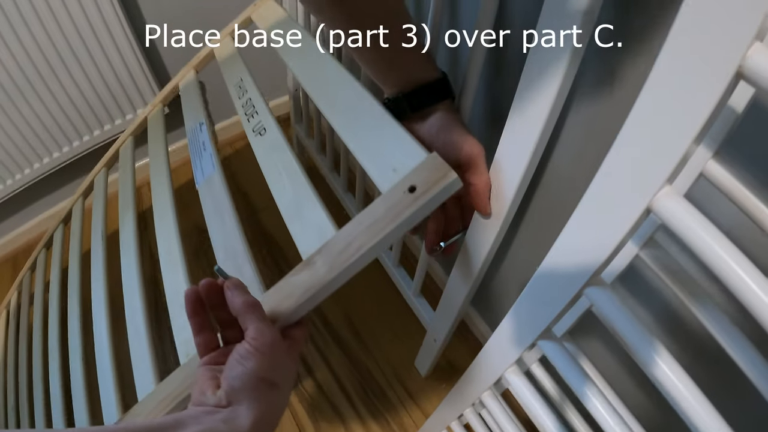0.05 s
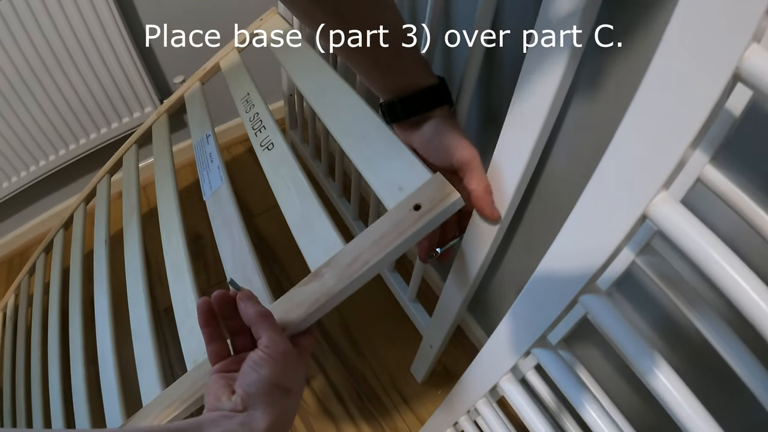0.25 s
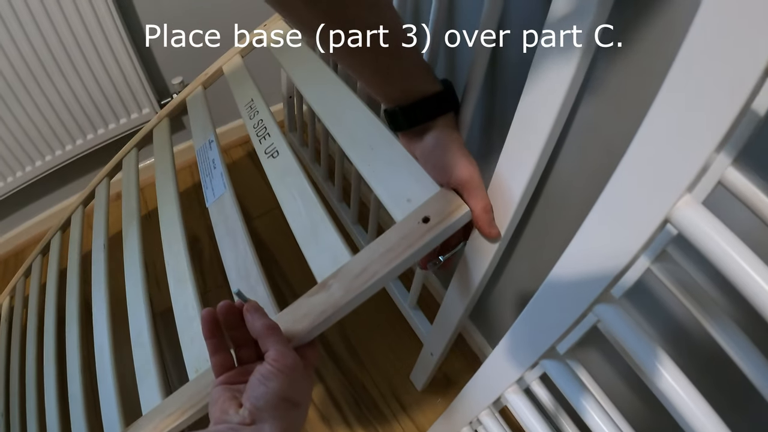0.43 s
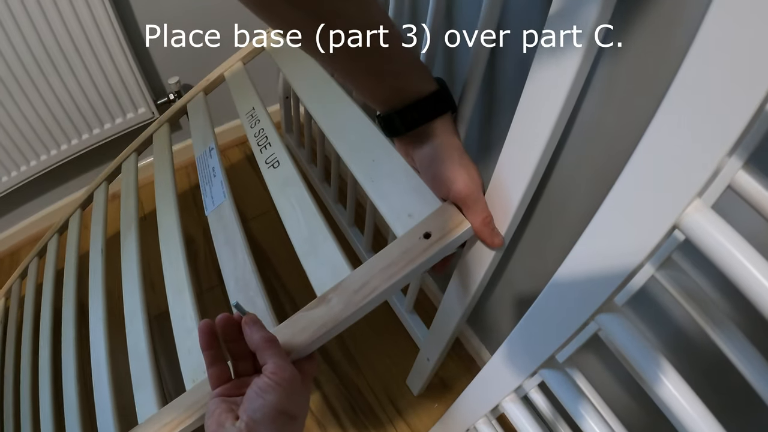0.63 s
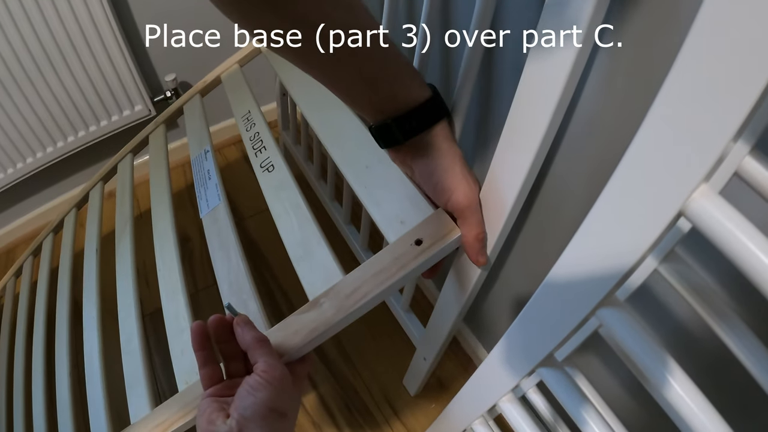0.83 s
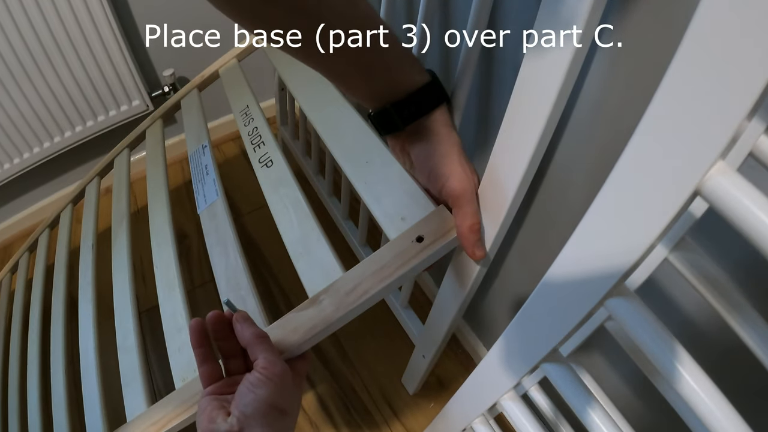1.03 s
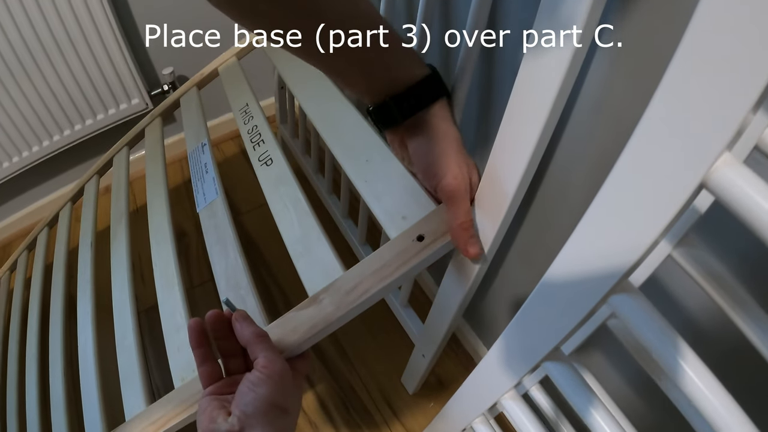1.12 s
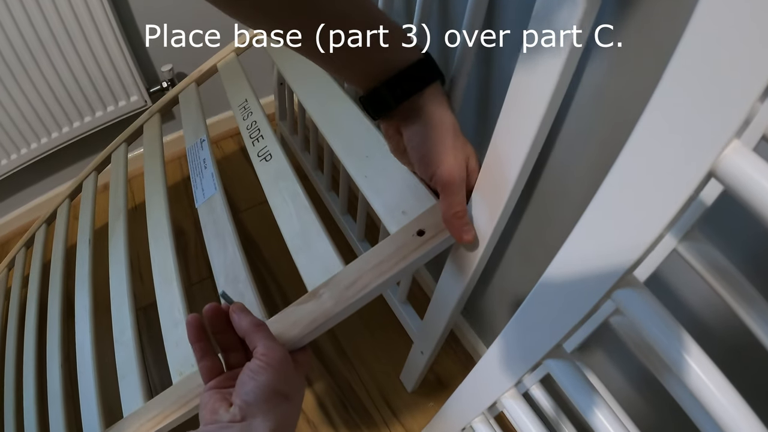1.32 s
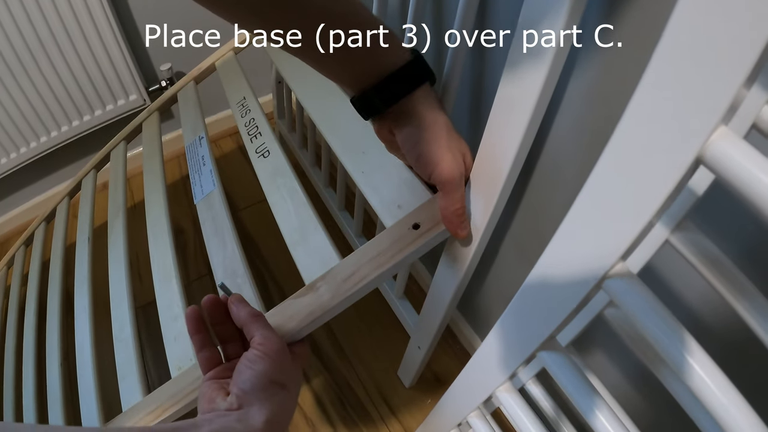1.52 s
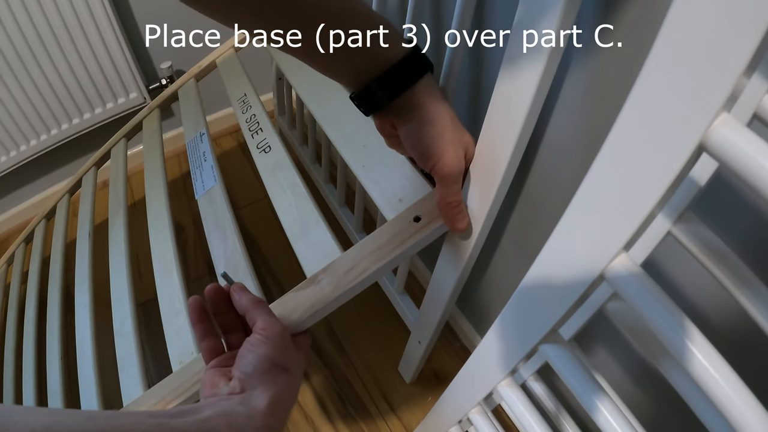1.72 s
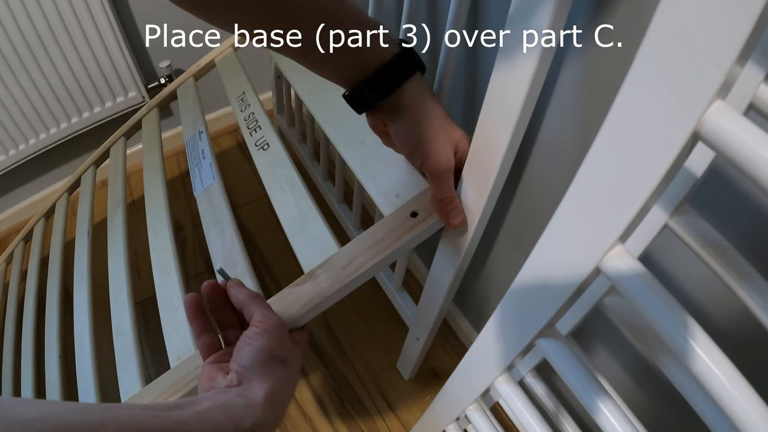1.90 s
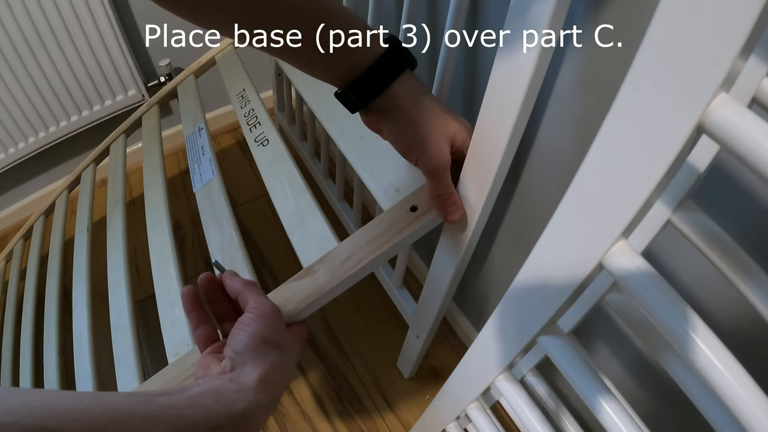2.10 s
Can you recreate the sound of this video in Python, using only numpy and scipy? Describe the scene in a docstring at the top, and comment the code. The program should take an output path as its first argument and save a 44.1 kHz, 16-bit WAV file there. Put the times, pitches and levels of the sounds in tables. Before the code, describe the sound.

A slatted wooden base thumps inside a cot frame, loudest around 0.3 seconds, mixed with light clacks. Softer bumps follow at 0.6 and 1.05 seconds, over faint hissing rubs and a low judder of the swaying frame. Sharp wood knocks and slat clacks come at about 1.35 and 1.75 seconds, then a brief low rumble near 2 seconds. It is about a metre away in a small quiet room.

```python
"""Fitting a bed base into a cot

A slatted wooden base is worked into its frame, about a metre away in a small quiet room. Dull
thumps ring the base and the cot, shoves set the frame swaying, wood meets wood in sharp knocks
and a loose slat clacks. Tiny stick-slips along the side make a hissing rub, a low judder and
brief scuffs. The brighter sounds get a short room echo, over a faint bed of air."""
import sys
import numpy as np
from scipy import signal
from scipy.fft import rfft, irfft, next_fast_len
from scipy.io import wavfile

SR = 44100
rng = np.random.default_rng(int(sys.argv[2]) if len(sys.argv) > 2 else 0)


def unload_wav(signal):
    """Save mono or channel-first audio to the path in sys.argv[1] as 16-bit WAV at rate SR, clipped to [-1, 1]."""
    wavfile.write(
        sys.argv[1],
        SR,
        np.round(np.clip(np.atleast_2d(signal).T, -1, 1) * 32767).astype(np.int16),
    )


N = 94815

# dull bumps of the base on the frame: start_s, level_db, contact_ms
THUMP_HITS = [(.236, -27.5, 7.35), (0.244, -39.5, 1.6), (.27, -27.5, 3.3), (.286, -26, 1.19),
              (0.3, -25.5, 4.17), (.348, -34.5, 5.73), (0.605, -34.5, 3.17), (0.619, -33, 5.5),
              (0.721, -45.5, 2.93), (0.845, -48.5, 4), (0.927, -47.5, 2.2), (1.043, -42, 2.24),
              (1.062, -40, 3.06), (1.937, -45.5, 5.6)]
# modes of the base: pitch_hz, level_db, t60_s
BASE_RESONANCES = [(104.4, -0.5, 0.33), (142.46, -2.5, 0.67), (166, -5, 0.51), (219.2, 1, 0.3),
                   (288.8, 2.5, 0.23), (312.9, 4, 0.16), (438.7, -5.5, 0.19), (472.3, -13, 0.35),
                   (540.5, -6, 0.2), (690, -10.5, 0.17)]
# dense resonances of the cot under a bump: freq_hz, level_db
BODY_EQ = [(40, -24), (90, 21.5), (150, 13), (320, 15.5), (390, -4.5), (700, -2.5), (1500, -18),
           (4000, -84.5)]
BASE_DB, BODY_DB, BODY_T60_S, THUMP_RISE_S = -6, -3.5, 0.33, 0.0091
# shoves that set the frame swaying: start_s, build_s, rock_db, flex_db
SWAY_SHOVES = [(0.283, 0.084, -43, -32), (0.48, 0.06, -42.5, -47.5), (.629, 0.13, -37, -30),
               (0.866, 0.16, -37, -39.5), (1.048, 0.094, -38.5, -37), (1.293, 0.057, -53.5, -67),
               (1.561, 0.082, -49, -63.5), (1.876, 0.17, -39.5, -38.5)]
ROCK_HZ, ROCK_T60_S, FLEX_HZ, FLEX_T60_S = 32.64, 0.64, 77.61, 0.82

# sharp knocks of wood on wood: start_s, level_db, tilt_db_per_octave, frame_modes_db
KNOCK_HITS = [(.206, -50, 2.5, -4), (.286, -41, -7.5, -22), (0.287, -53.5, 1.5, -15),
              (.603, -49.5, -0.5, -22), (.929, -54.5, -0.5, -14), (1.3327, -45, 0.5, -32),
              (1.342, -48.5, -2, -22), (1.7624, -36.5, 0.5, -15)]
# tone of bare wood contact in knocks, clacks and scuffs: freq_hz, level_db
CONTACT_EQ = [(40, -29), (400, -0.5), (750, 4), (1100, 5.5), (1700, 2), (2300, -7), (3300, -11.5),
              (4400, -17), (8000, -29), (12000, -52.5)]
SNAP_DB, CRACK_T60_S = 3.5, 0.027
# clearest modes of the frame in a knock: pitch_hz, level_db, t60_s
FRAME_RESONANCES = [(1060, -12, .15), (1700, -9, .08), (2880, 0, .12), (3120, -7, .1), (3380, -12, .15)]
# the frame's dense ring after a knock: freq_hz, level_db
FRAME_RING_EQ = [(60, -44), (700, -14.5), (1100, 1), (1700, -2.5), (2200, 1.5), (3200, -2.5), (4400, -16.5),
                 (8000, -23.5), (12000, -52)]
RING_DB, RING_T60_S, RING_RISE_S = -10, 0.17, 0.0012

# loose slat clacks: start_s, level_db, pitch_ratio, tilt_db_per_octave, sustain_ratio, lowest_mode_db
CLACK_HITS = [(.209, -44.5, 1.01, 0, .36, -1), (.221, -43, 1.0, -1, .7, -14),
              (.384, -48.5, .98, -4, .8, -6), (.715, -57.5, 1., -3, 1., -1), (1.03, -53, .95, -5, .7, 1),
              (1.055, -50, .95, -5, .6, 0), (1.393, -42.5, .99, 0, 1., 0),
              (1.7365, -42.5, 1.0, -.5, .55, -.5), (2.095, -61, 1., 0, .9, 0)]
# modes of the slat: pitch_hz, level_db, t60_s
SLAT_RESONANCES = [(990, -3.5, .14), (1405, -9, .11), (1545, -8, .085), (1635, -7, .1), (2720, -17, .08),
                   (3120, -17, .09), (4970, -17.5, .032)]
SLAT_TICK_DB = -7.5
# the cot's low after-ring behind a knock or clack: freq_hz, level_db
HOLLOW_EQ = [(90, -39), (215, 5), (400, -5.5), (700, -8), (1000, -9), (2500, -52.5)]
HOLLOW_DB, HOLLOW_T60_S = -17, 0.6

# swells of the base rubbing along the side: time_s, level_db
RUB_ENVELOPE = [(0.186, -86.5), (0.229, -68), (0.442, -75), (0.558, -72), (0.719, -65), (0.811, -68),
                (.86, -76.5), (0.932, -70), (1.041, -67), (1.137, -86), (1.216, -72.5), (1.371, -65),
                (1.439, -76), (1.6, -83), (1.649, -75), (1.701, -86.5), (1.8, -66.5), (1.9, -77),
                (1.972, -67.5), (2.08, -98.5), (2.15, -73.5)]
# hiss of the rub: freq_hz, level_db
RUB_EQ = [(200, -3), (600, -6.5), (1400, 7), (2200, 4.5), (3400, 4), (5000, -1), (7500, -8), (10000, -18.5),
          (12500, -22)]
# wood modes that the rub excites: pitch_hz, level_db, t60_s
RUB_RESONANCES = [(1350, 0, .13), (1650, -1, .08), (2110, -2, .08), (2700, 1, .035), (3330, 3, .04),
                  (3850, 1, .04), (4520, 1, .02)]
RUB_SLIPS_PER_S, RUB_SCATTER_DB, RUB_RING_DB = 5000, 1, -7.5
# stretches of low stick-slip judder: middle_s, half_length_s, level_db
JUDDER_SWELLS = [(0.741, 0.056, -48.5), (1.002, 0.11, -54.5), (1.234, 0.23, -63.5), (1.896, 0.048, -54),
                 (1.97, 0.06, -50.5), (2.15, 0.071, -59.5)]
# rumble of the judder: freq_hz, level_db
JUDDER_EQ = [(30, -23), (60, -7.5), (120, 7), (170, 5), (320, 0.5), (450, -12.5), (1200, -24.5),
             (4000, -67)]
JUDDER_SLIPS_PER_S, JUDDER_SCATTER_DB = 1200, -2
# an edge catches and drags: middle_s, half_length_s, level_db, tilt_db_per_octave
SCUFF_BURSTS = [(0.387, 0.013, -67.5, 7.5), (0.847, 0.0069, -63, -4), (.95, 0.017, -58.5, -9)]

# tone of the room's echo: freq_hz, level_db
ROOM_EQ = [(4000, 0.5), (12000, -12.5)]
ROOM_DB, ROOM_T60_S, ROOM_DELAY_S = -7, 0.31, 0.006
# steady room tone: freq_hz, level_db
AIR_EQ = [(25, -2), (260, -7), (400, -19), (750, -25.5), (1200, -21.5), (1700, -30), (3000, -51),
          (7000, -44.5), (12500, -70)]
AIR_DB = -65
# stereo width across the spectrum: freq_hz, side_gain_db
WIDTH_EQ = [(30, -14.5), (120, -67), (250, -29.5), (500, -13.5), (1000, -11.5), (2000, -8.5), (4000, -8.5),
            (10000, -8.5)]
SPREAD_T60_S, TOP_HZ = 0.08, 12650


def thumps():
    """A soft push and its rebound ring the base and the cot; a longer contact is deeper."""
    out = np.zeros(N)
    for start, db, contact_ms in THUMP_HITS:
        phase = np.pi * np.minimum(clock() * 1000 / contact_ms, 1)
        push = np.sin(phase) ** 2 * np.sin(2 * phase)
        base = undb(BASE_DB) * ring(BASE_RESONANCES)
        cot = undb(BODY_DB) * noise(BODY_EQ) * fade(BODY_T60_S)
        thump = signal.fftconvolve(rise(THUMP_RISE_S) * (base + cot), push / np.abs(push).sum())
        out += undb(db) * at(start, thump)
    return out


def sway():
    """Each shove builds up the frame's slow rocking and its deep flexing mode."""
    out = np.zeros(N)
    for start, build_s, rock_db, flex_db in SWAY_SHOVES:
        swell = np.sin(np.pi / 2 * rise(build_s)) ** 2
        frame = ring([(ROCK_HZ, rock_db, ROCK_T60_S), (FLEX_HZ, flex_db, FLEX_T60_S)])
        out += at(start, swell * frame)
    return out


def knocks():
    """Wood hits wood: a snap, a short crack, then the frame's modes within its dense ring."""
    out = np.zeros(N)
    for start, db, tilt_db, modes_db in KNOCK_HITS:
        pulse = colour(signal.unit_impulse(N), CONTACT_EQ, tilt_db)
        snap = undb(SNAP_DB) * pulse / np.abs(pulse).max()
        crack = noise(CONTACT_EQ, tilt_db) * fade(CRACK_T60_S)
        modes = undb(modes_db) * ring(FRAME_RESONANCES)
        dense_ring = undb(RING_DB) * noise(FRAME_RING_EQ, tilt_db) * fade(RING_T60_S)
        tail = rise(RING_RISE_S) * (modes + dense_ring + hollow())
        out += undb(db) * at(start, snap + crack + tail)
    return out


def clacks():
    """A loose slat is tapped: a tick, then a pitched ring, shorter when the slat is pressed."""
    out = np.zeros(N)
    for start, db, pitch, tilt_db, sustain, lowest_db in CLACK_HITS:
        tick = undb(SLAT_TICK_DB) * noise(CONTACT_EQ, tilt_db) * fade(CRACK_T60_S)
        slat = ring(SLAT_RESONANCES, pitch, tilt_db, sustain)
        # the spot struck sets the weight of the lowest mode
        slat += (undb(lowest_db) - 1) * ring(SLAT_RESONANCES[:1], pitch, tilt_db, sustain)
        out += undb(db) * at(start, rise(RING_RISE_S) * (slat + tick + hollow()))
    return out


def hollow():
    """The cot's panels keep ringing low after a hard contact."""
    return undb(HOLLOW_DB) * noise(HOLLOW_EQ) * fade(HOLLOW_T60_S)


def rubbing():
    """Dense tiny slips hiss and make the wood ring as the base slides."""
    slips = grains(RUB_SLIPS_PER_S, RUB_SCATTER_DB)
    hiss = unit(colour(slips, RUB_EQ))
    wood = unit(signal.fftconvolve(slips, ring(RUB_RESONANCES))[:N])
    envelope = undb(np.interp(clock(), *np.array(RUB_ENVELOPE).T))
    return (hiss + undb(RUB_RING_DB) * wood) * envelope


def judder():
    """Coarser slips rumble through the frame while the base is pressed against it."""
    pressure = sum(undb(db) * bell_curve(middle, half) for middle, half, db in JUDDER_SWELLS)
    slips = grains(JUDDER_SLIPS_PER_S, JUDDER_SCATTER_DB)
    return pressure * unit(colour(slips, JUDDER_EQ))


def scuffs():
    """An edge catches for a moment: a burst of slips, brighter for a lighter touch."""
    out = np.zeros(N)
    for middle, half, db, tilt_db in SCUFF_BURSTS:
        slips = grains(RUB_SLIPS_PER_S, RUB_SCATTER_DB)
        out += undb(db) * bell_curve(middle, half) * unit(colour(slips, CONTACT_EQ, tilt_db))
    return out


def room(x):
    """Short diffuse echo of a small room whose furnishings soak up the top."""
    return undb(ROOM_DB) * at(ROOM_DELAY_S, colour(diffuse(x, ROOM_T60_S), ROOM_EQ))


def air():
    """Faint, steady room tone, mostly lows."""
    return undb(AIR_DB) * noise(AIR_EQ)


def ring(modes, pitch=1, tilt_db=0, sustain=1):
    """Struck modes, each dying at its own rate, tilted per octave above the first."""
    out = np.zeros(N)
    for hz, db, t60 in modes:
        gain = undb(db + tilt_db * np.log2(hz / modes[0][0]))
        out += gain * fade(t60 * sustain) * np.sin(2 * np.pi * hz * pitch * clock())
    return out


def grains(per_s, scatter_db):
    """Random tiny slips of uneven size."""
    signed_clicks = (rng.random(N) < per_s / SR) * rng.choice([-1, 1], N)
    return signed_clicks * undb(scatter_db * rng.exponential(size=N))


def noise(eq, tilt_db=0):
    """Coloured noise of rms 1."""
    return unit(colour(rng.standard_normal(N), eq, tilt_db))


def colour(x, eq, tilt_db=0):
    """Minimum-phase EQ through (Hz, dB) points, tilted per octave about 1500 Hz."""
    size = 2 * next_fast_len(N, real=True)
    octave = np.log2(np.maximum(np.arange(size // 2 + 1) * SR / size, 10))
    hz, db = np.array(eq, float).T
    tilt = tilt_db * np.maximum(octave - np.log2(1500), -2)
    gain = undb(np.interp(octave, np.log2(hz), db) + tilt)
    # fold the cepstrum so nothing rings ahead of a hit
    cepstrum = irfft(np.log(gain))
    cepstrum[1:size // 2] *= 2
    cepstrum[size // 2 + 1:] = 0
    return irfft(rfft(x, size) * np.exp(rfft(cepstrum)))[:N]


def diffuse(x, t60):
    """Smear a sound into dense reflections of about the same energy."""
    tail = rng.standard_normal(N) * fade(t60)
    return signal.fftconvolve(x, tail / np.linalg.norm(tail))[:N]


def rise(length_s):
    """Linear attack."""
    return np.minimum(clock() / length_s, 1)


def fade(t60):
    """Exponential decay, 60 dB down after t60 seconds."""
    return np.exp(-np.log(1000) * clock() / t60)


def bell_curve(middle_s, half_length_s):
    """Smooth swell in and out."""
    return np.exp(-((clock() - middle_s) / half_length_s) ** 2)


def at(start_s, x):
    """Delay a sound to its cue."""
    return np.concatenate([np.zeros(int(start_s * SR)), x])[:N]


def clock():
    """Time of each sample in seconds."""
    return np.arange(N) / SR


def unit(x):
    """Scale to rms 1."""
    return x / np.sqrt(np.mean(x ** 2))


def undb(db):
    """Decibels to gain."""
    return 10 ** (np.asarray(db) / 20)


def scene():
    """Mid-side mix: the bass sits near the centre and the treble spreads, most of all the hiss."""
    low = thumps() + sway() + judder()
    contacts = clacks() + knocks() + scuffs()
    high = contacts + rubbing()
    mid = low + high + room(high) + air()
    side = colour(diffuse(low + contacts, SPREAD_T60_S) + rubbing() + air(), WIDTH_EQ)
    return np.array([mid + side, mid - side])


def record(dry):
    """A steep low-pass trims the very top."""
    return signal.sosfilt(signal.ellip(8, .2, 70, TOP_HZ, fs=SR, output="sos"), dry)


dry = scene()
out = record(dry)
unload_wav(out)
```